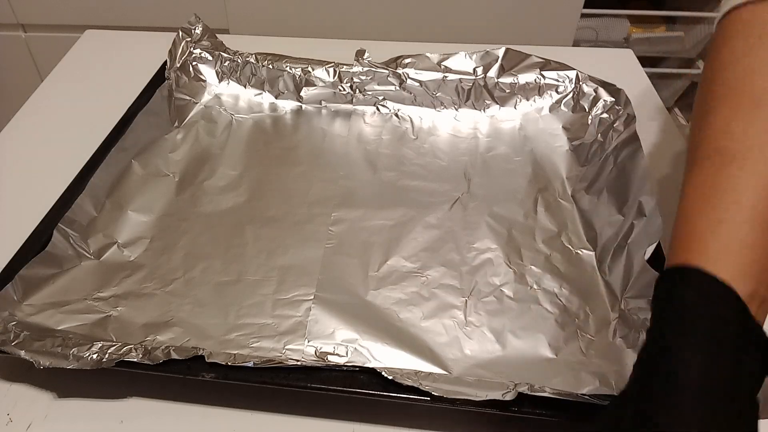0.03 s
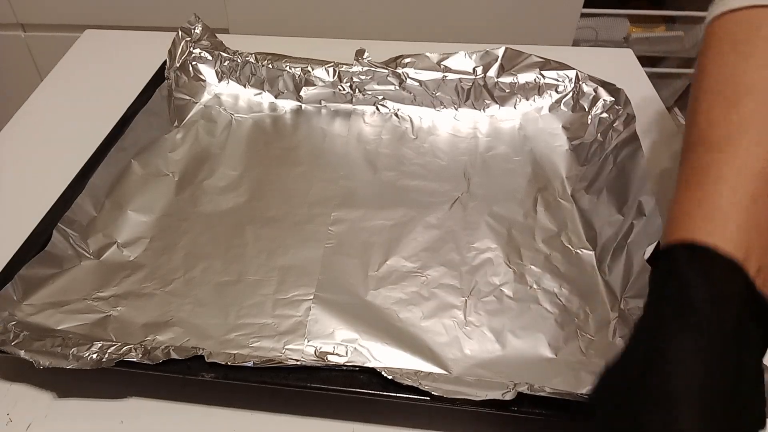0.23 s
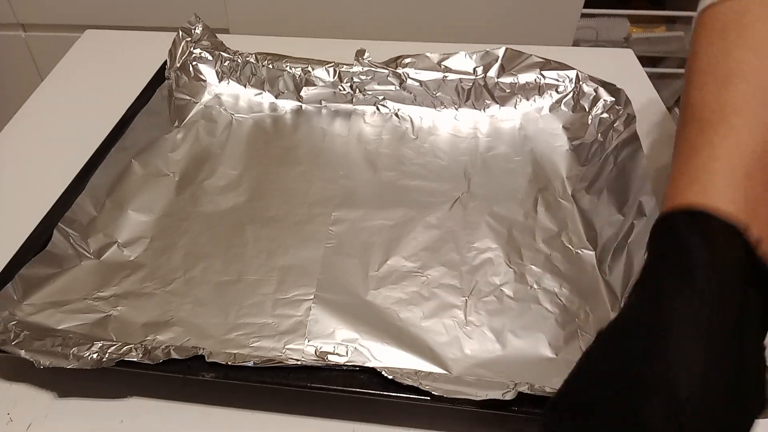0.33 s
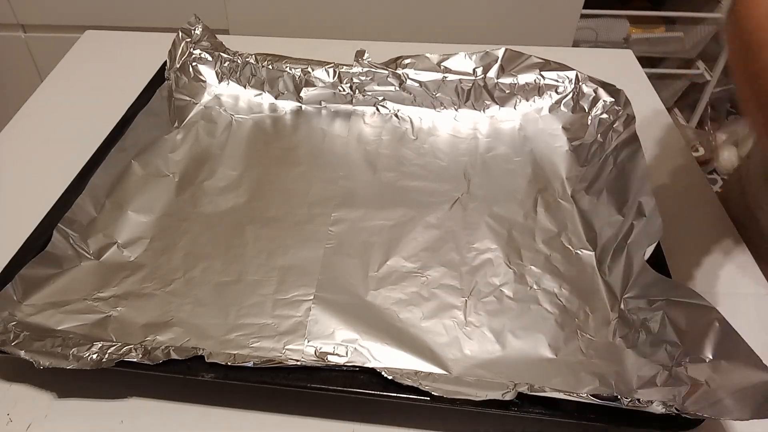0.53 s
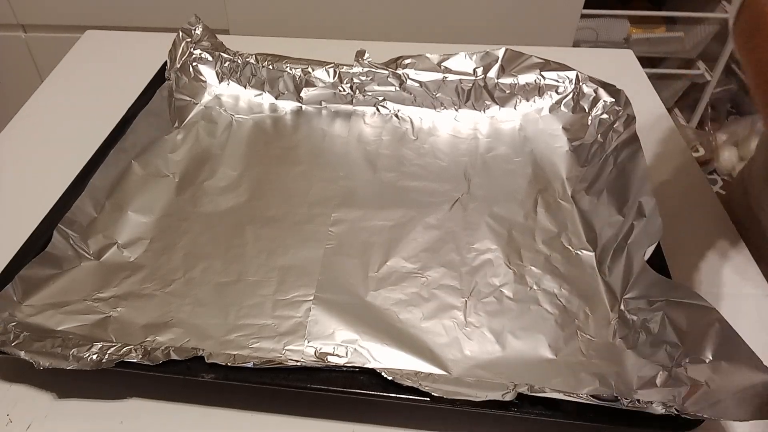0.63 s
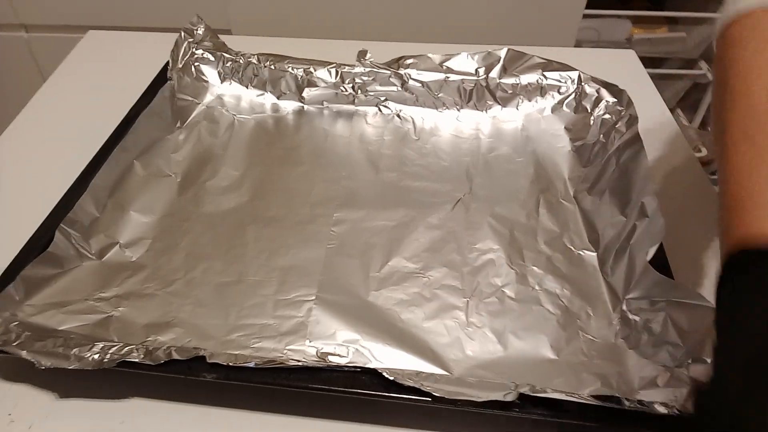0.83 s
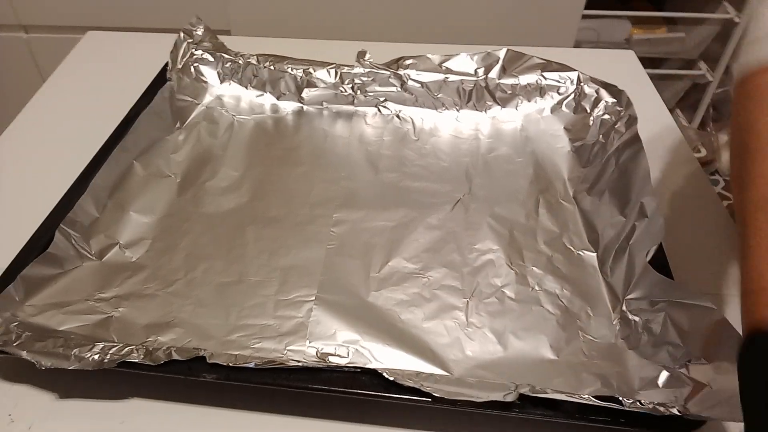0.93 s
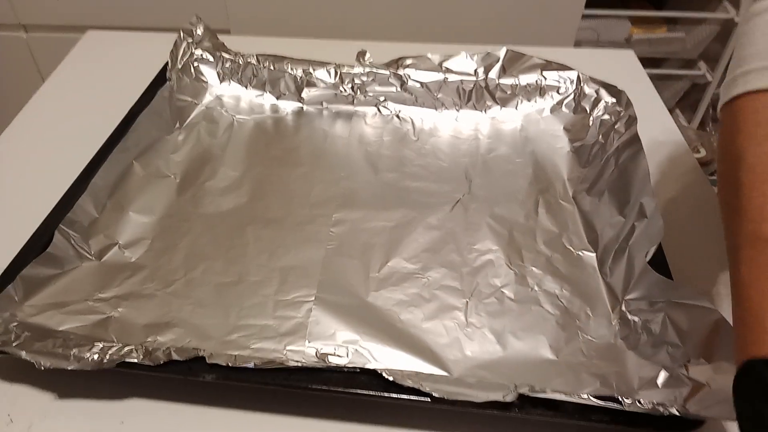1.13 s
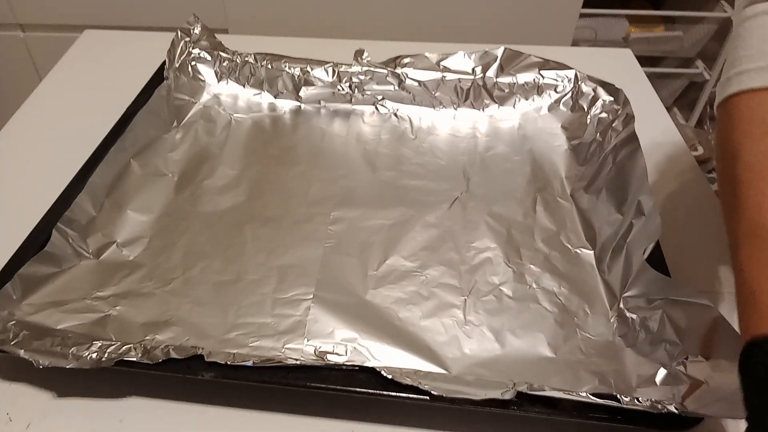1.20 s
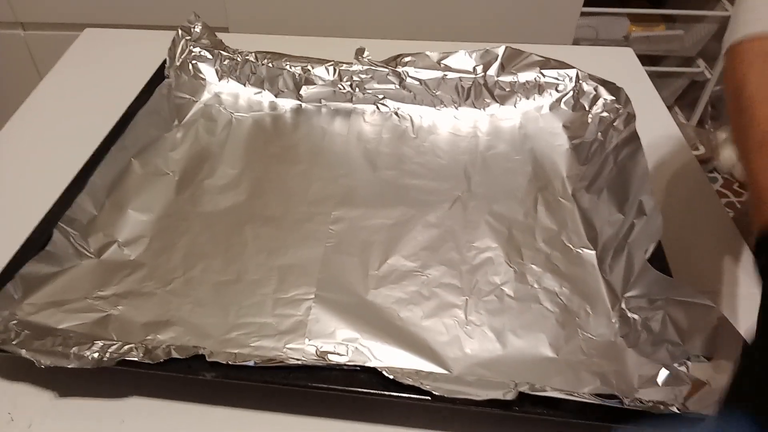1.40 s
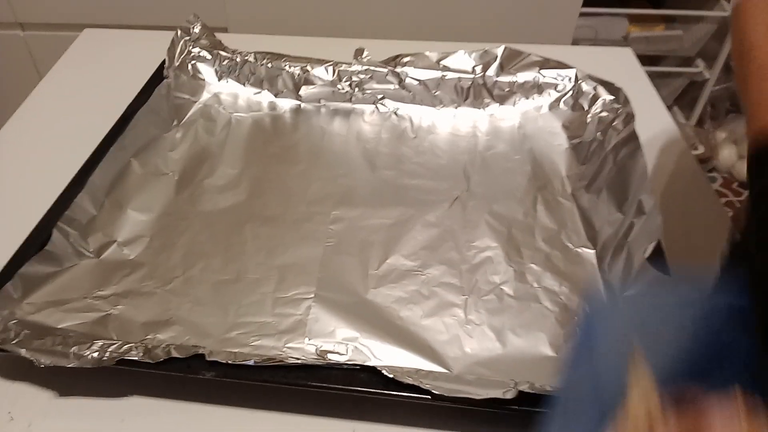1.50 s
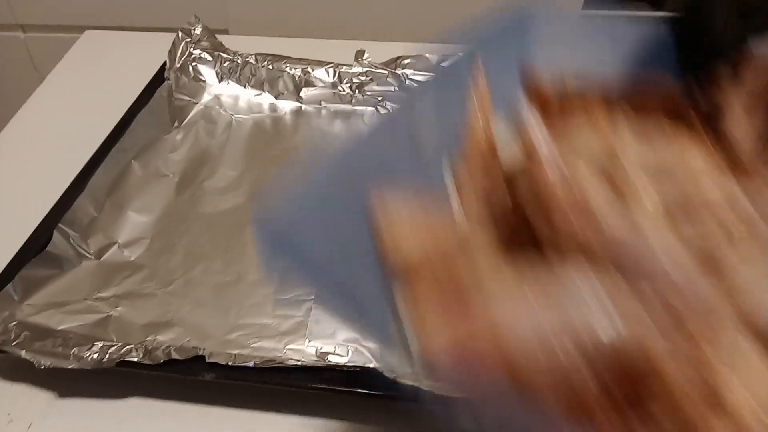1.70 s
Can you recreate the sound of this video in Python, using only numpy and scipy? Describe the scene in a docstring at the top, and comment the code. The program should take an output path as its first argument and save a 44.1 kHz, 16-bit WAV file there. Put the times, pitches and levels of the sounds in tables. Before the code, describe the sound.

Foil on a baking tray rustles and snaps in short swipes. Light taps and slides lead to one hard knock as an object is set down, and worktop and tray ring briefly. Fainter crinkles follow, close by in a small kitchen.

```python
"""Foil on a baking tray rustles in short swipes and snaps where it buckles.
Someone moves beside the tray in a small kitchen: light taps and slides lead to one hard knock as an
object is set down, and worktop and tray ring on. Soft low bumps come through worktop and floor.
The room rings briefly over still air."""
import sys
import numpy as np
from scipy import signal
from scipy.fft import rfft, irfft
from scipy.io import wavfile

SR = 44100
rng = np.random.default_rng(int(sys.argv[2]) if len(sys.argv) > 2 else 0)


def wrap_up_sound(samples):
    """Save the sound to the file named by the first command line argument, as 16-bit audio."""
    columns = np.atleast_2d(samples).T
    # keep every value between -1 and 1, then stretch to whole-number steps
    tamed = np.clip(columns, -1, 1)
    steps = np.round(tamed * 32767).astype(np.int16)
    wavfile.write(sys.argv[1], SR, steps)


N = 77175
TIME_S = np.arange(N) / SR
FREQ_HZ = np.fft.rfftfreq(N, 1 / SR)

# worktop and tray modes: f/Hz, level/dB, t60/s
TRAY_MODES = [(118.3, -4.5, 0.39), (183.4, -7, 0.23), (283.7, 1, .36), (339, -12, 0.41), (412.4, 2, .45),
              (501, 0.5, 0.4), (624.4, -4.5, 0.35), (649, -10, 0.5), (728, -7.5, 0.58), (802, -3, 0.46),
              (854, 1, .25), (891, -3.5, 0.4), (947, -4, .3), (1104, -11, .3), (1200, -11, .35),
              (1650, -7, .4), (1854, -13, 0.52)]


def rustle():
    """Foil swipes, each with its own mix of bright hiss and duller body."""
    # swipes: peak t/s, 20 dB rise/s, 20 dB fall/s, hiss level/dB, body level/dB
    swipes = [(0.0, .05, .12, -49, -50), (.085, .06, .1, -53, -55), (.107, .004, .05, -47, -36),
              (.124, .02, .06, -45, -35), (.165, .06, .2, -42, -45), (.24, .07, .16, -42, -45),
              (.35, .14, .14, -41, -45), (.388, .03, .09, -41, -45), (.505, .02, .12, -46, -49),
              (.570, .008, .11, -32, -37), (.585, .015, .09, -40, -37), (.662, .05, .1, -42, -42),
              (.718, .035, .11, -35, -38), (.748, .02, .14, -39, -42), (.87, .2, .3, -48, -51),
              (.945, .03, .3, -49, -52), (1.09, .16, .1, -46, -48), (1.135, .07, .15, -45, -49),
              (1.27, .14, .17, -55, -52), (1.36, .1, .3, -63, -69), (1.704, .05, .028, -49, -57),
              (1.72, .15, .25, -59, -65)]
    # bright and dull spectra: f/Hz, level/dB
    hiss_spectrum = [(1500, -6), (3000, -9), (4500, 0), (7000, 0), (11000, -4.5), (16000, -6)]
    body_spectrum = [(200, -22.5), (500, -6), (1100, 1), (2000, -3.5), (3300, -1.5), (5000, -11.5),
                     (10000, -35)]
    hiss_power, body_power = 0, 0
    for peak_s, rise_s, fall_s, hiss_db, body_db in swipes:
        envelope = swell(peak_s, rise_s, fall_s)
        hiss_power += (from_db(hiss_db) * envelope) ** 2
        body_power += (from_db(body_db) * envelope) ** 2
    hiss = np.sqrt(hiss_power) * colour(crinkle(), hiss_spectrum)
    body = np.sqrt(body_power) * colour(crinkle(), body_spectrum)
    return hiss + body


def crinkle(rate_per_s=2200, spread_db=4.5, direct_share=0.32, pan_db=5.5):
    """Countless tiny creases giving way, heard directly and scattered by the room."""
    sizes = from_db(spread_db * np.minimum(rng.exponential(1, N), 4)) * rng.choice([-1, 1], N)
    grains = sizes * (rng.random(N) < rate_per_s / SR)
    direct = rms_one(place(grains, pan_db, lead_s=0.0003018))
    scattered = diffuse() * from_db([[pan_db / 4], [-pan_db / 4]])
    return np.sqrt(direct_share) * direct + np.sqrt(1 - direct_share) * scattered


def snaps(crackle_db=-12.5, crackle_t60_s=0.011, tick_db=-3, pitch_spread=0.093):
    """A crease flips with a tick, a crackle and a short ring; small creases sound thinner."""
    # buckles: t/s, level/dB, high-pass f/Hz
    buckles = [(0.0459, -28, 980), (.0622, -26.5, 2500), (0.2267, -14.5, 2520), (0.2435, -17.5, 4000),
               (.3222, -19, 3000), (0.3334, -5.5, 900), (0.3616, -13, 2740), (0.3625, -11, 2800),
               (.3712, -2.5, 394), (0.4979, -15.5, 1500), (.7158, -14.5, 1200), (.9425, -24.5, 2000),
               (1.2245, -30, 6000), (1.2487, -24, 5500), (1.2655, -33, 6000), (1.289, -24.5, 4520),
               (1.3305, -34, 6000), (1.3495, -28, 6540), (1.597, -44, 6000)]
    # crease modes: f/Hz, level/dB, t60/s
    crease_modes = [(650, -16.5, 0.0044), (1490, -16.5, 0.0083), (2900, -15, 0.0049), (3820, -16, 0.0042),
                    (5950, -16, 0.0033), (7540, -13, 0.0018), (12850, -25.5, 0.00033)]
    # echo colour: f/Hz, level/dB
    echo_spectrum = [(200, 8), (1200, 5), (3500, 0.5), (7000, -2.5), (15000, -5.5)]
    pole = from_db(-60 / (crackle_t60_s * SR))
    direct, total_force = 0, 0
    for t_s, level_db, highpass_hz in buckles:
        flip = clicks([(t_s, level_db)])
        decay = signal.lfilter([1], [1, -pole], flip + 1e-18)
        crackle = from_db(crackle_db) * decay * rng.standard_normal(N)
        force = cut(flip + crackle, highpass_hz, "high")
        modes = [(hz * (1 + pitch_spread * rng.uniform(-1.05, 1)), db, t60_s)
                 for hz, db, t60_s in crease_modes]
        direct += ring(force, modes) + from_db(tick_db) * force
        total_force += force
    room = from_db(-3.5) * echo(total_force, echo_spectrum)
    return from_db(-2) * (place(direct, pan_db=9, lead_s=0.00025) + room)


def knocks(crack_db=7.5, landing_s=0.7295, tail_attack_s=0.0083):
    """The object taps, lands and rattles with dead clacks; the landing rings worktop and tray."""
    # contacts: t/s, level/dB, low-pass f/Hz
    contacts = [(.0465, -33, 1160), (.2085, -20, 890), (0.2266, -21.5, 950), (0.4969, -15.5, 1050),
                (0.6192, -20.5, 1000), (.6495, -27, 800), (.7283, -9.5, 2970), (0.7295, 0.5, 2250),
                (.7326, -7.5, 3500), (0.7394, -16.5, 3000), (0.7478, -17, 3000)]
    # damped modes of the struck surface: f/Hz, level/dB, t60/s
    clack_modes = [(330, -26.5, 0.018), (596, -17.5, 0.0088), (853, -3, 0.0093), (1480, -15, .008),
                   (2030, -7.5, 0.0044), (3550, -11, 0.0044)]
    # echo colour: f/Hz, level/dB
    echo_spectrum = [(60, -27), (150, -3), (300, -7), (550, -0.5), (900, -3), (1300, -3.5), (2000, -7.5),
                     (3000, -10.5), (5000, -17), (12000, -13.5)]
    force = sum(cut(clicks([(t_s, db)]), hz, "low") for t_s, db, hz in contacts)
    clack = ring(force, clack_modes) + from_db(crack_db) * force
    clack = from_db(-0.5) * cut(clack, hz=257, kind="high")
    tail = ring(clicks([(landing_s, -27.5)]), TRAY_MODES)
    tail *= np.clip((TIME_S - landing_s) / tail_attack_s, 0, 1)
    room = from_db(14) * echo(cut(force, hz=70.5, kind="high"), echo_spectrum)
    return place(clack, pan_db=5.5, lead_s=0.00022) + room + place(tail, pan_db=2.5, lead_s=0.0001)


def bumps():
    """Soft blows stir only the low modes of worktop and floor."""
    # blows: t/s, level/dB
    blows = [(.048, -9.5), (.064, -5.5), (.112, -10.5), (.165, -3), (.209, 5), (.231, -0.5), (.285, -9),
             (.345, -6.5), (.499, -0.5), (.572, -2), (.738, 4), (.79, 2.5), (1.25, -14.5), (1.512, -15),
             (1.553, -20.5)]
    # worktop and floor modes: f/Hz, level/dB, t60/s
    low_modes = [(75, -13, 0.63), (99.4, -6, 0.26), (128.3, -1.5, 0.22), (146, -2, 0.184), (185.5, -2, .22)]
    # echo colour: f/Hz, level/dB
    echo_spectrum = [(40, 8), (120, 0.5), (15000, 0)]
    boom = ring(clicks(blows), low_modes)
    boom = cut(boom, hz=65.5, kind="high")
    boom = cut(boom, hz=264, kind="low")
    room = from_db(-16.5) * echo(boom, echo_spectrum)
    return from_db(-37) * (place(boom, pan_db=0.5, lead_s=0.0003018) + room)


def slides(skirt_db=-10, hum_db=-10):
    """Dull, grainy friction as the object is pushed along; worktop and tray hum with it."""
    # pushes: peak t/s, 20 dB rise/s, 20 dB fall/s, level/dB, friction centre f/Hz
    pushes = [(0.198, 0.09, 0.21, -42.5, 834), (0.649, 0.13, 0.2165, -37.5, 703),
              (1.12, 0.14, 0.16, -55.5, 627), (1.205, 0.27, 0.03, -50.5, 810), (1.26, 0.19, 0.25, -47, 398),
              (1.70, 0.15, 4, -62.5, 580)]
    rub = 0
    for peak_s, rise_s, fall_s, db, hz in pushes:
        hump = [(hz * 2 ** octave, skirt_db * abs(octave) ** 1.4) for octave in np.linspace(-3, 3, 13)]
        rub += from_db(db) * swell(peak_s, rise_s, fall_s) * colour(crinkle(), hump)
    hum = rms_one(ring(rub, TRAY_MODES)) * np.sqrt(np.mean(rub ** 2))
    return rub + from_db(hum_db) * hum


def echo(x, spectrum, onset_s=0.0019):
    """Dense stereo room reflections, dying fastest in the top treble."""
    # room decay: f/Hz, t60/s
    room_t60 = [(80, 0.65), (300, 0.54), (800, 0.51), (2000, 0.45), (6000, 0.6), (15000, 0.16)]
    noise = rfft(diffuse()) * from_db(at_hz(spectrum, FREQ_HZ))
    centres_hz = np.geomspace(60, 15000, 9)
    response = 0
    for centre_hz, weights in zip(centres_hz, np.eye(len(centres_hz))):
        band = irfft(noise * at_hz(np.c_[centres_hz, weights], FREQ_HZ), N)
        response += band * from_db(-60 * TIME_S / at_hz(room_t60, centre_hz))
    response *= np.clip(TIME_S / onset_s - 0.5, 0, 1)
    response = rms_one(response) / np.sqrt(N)
    return signal.fftconvolve(x[None], response, axes=1)[:, :N]


def air(level_db=-57):
    """Still kitchen air: faint, low, steady noise."""
    # air spectrum: f/Hz, level/dB
    spectrum = [(20, -45), (50, -30), (90, -9.5), (160, 1), (280, -3.5), (420, -16), (700, -6), (1200, -24),
                (3000, -26.5), (7000, -23.5), (16000, -29)]
    return from_db(level_db) * colour(diffuse(), spectrum)


def diffuse():
    """White stereo noise from all around: alike in the bass, unrelated in the treble."""
    # room field: f/Hz, left-right correlation
    likeness = [(60, 0.56), (150, 0.97), (300, 0.69), (600, 0.47), (1200, 0), (16000, 0.049)]
    mid, side = rfft(rng.standard_normal((2, N)))
    alike = at_hz(likeness, FREQ_HZ)
    return irfft(np.sqrt(1 + alike) * mid + np.sqrt(1 - alike) * side * [[1], [-1]], N)


def from_db(db):
    """Decibels to gain."""
    return 10 ** (np.asarray(db) / 20)


def rms_one(x):
    """Scale to unit power."""
    return x / np.sqrt(np.mean(x ** 2) + 1e-20)


def at_hz(points, hz):
    """Interpolate (f/Hz, value) rows on a log-frequency axis."""
    knots_hz, values = np.transpose(points)
    return np.interp(np.log(np.maximum(hz, 1)), np.log(knots_hz), values)


def colour(x, spectrum):
    """Shape noise by (f/Hz, level/dB) rows; unit power."""
    return rms_one(irfft(rfft(x) * from_db(at_hz(spectrum, FREQ_HZ)), N))


def place(x, pan_db, lead_s):
    """Near source: the left side is louder by pan_db and earlier by lead_s."""
    delayed = np.interp(TIME_S - lead_s, TIME_S, x, left=0)
    return np.array([x * from_db(pan_db / 2), delayed * from_db(-pan_db / 2)])


def clicks(rows):
    """One impulse per (t/s, level/dB) row."""
    impulses = np.zeros(N)
    for t_s, db in rows:
        impulses[int(t_s * SR)] += from_db(db)
    return impulses


def ring(x, modes):
    """Drive decaying modes of alternating sign."""
    total = 0
    for k, (hz, db, t60_s) in enumerate(modes):
        radius, step_rad = from_db(-60 / (t60_s * SR)), 2 * np.pi * hz / SR
        feedback = [1, -2 * radius * np.cos(step_rad), radius ** 2]
        total += (-1) ** k * from_db(db) * signal.lfilter([0, np.sin(step_rad)], feedback, x + 1e-18)
    return total


def swell(peak_s, rise_s, fall_s):
    """Envelope: up 20 dB per rise_s to 1 at peak_s, then down 20 dB per fall_s."""
    return from_db(-20 * np.maximum((peak_s - TIME_S) / rise_s, (TIME_S - peak_s) / fall_s))


def cut(x, hz, kind):
    """Second-order low-pass or high-pass."""
    return signal.sosfilt(signal.butter(2, hz, kind, fs=SR, output="sos"), x + 1e-18)


def scene():
    """Foil and object handling over kitchen air."""
    return rustle() + snaps() + knocks() + bumps() + slides() + air()


def record(dry, cutoff_hz=15900):
    """Microphone: a treble peak and dip, then a steep low-pass."""
    # peak and dip: f/Hz, gain/dB, width/Hz
    mic_bands = [(7520, 6, 1030), (9370, -7.5, 2860)]
    for hz, db, width_hz in mic_bands:
        band = signal.lfilter(*signal.iirpeak(hz, hz / width_hz, fs=SR), dry)
        dry = dry + (from_db(db) - 1) * band
    return signal.sosfilt(signal.ellip(12, 0.2, 80, cutoff_hz, fs=SR, output="sos"), dry)


dry = scene()
out = record(dry)
wrap_up_sound(out)
```